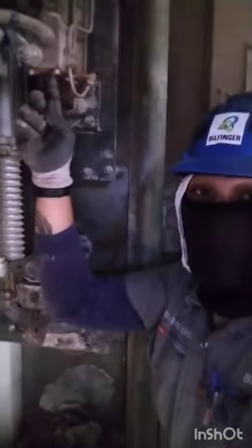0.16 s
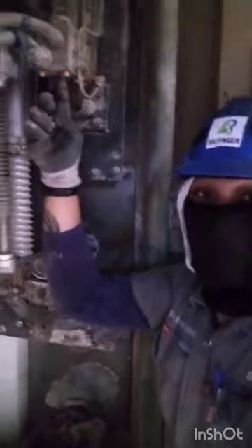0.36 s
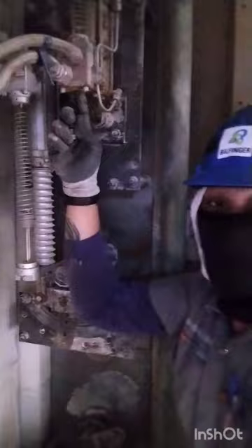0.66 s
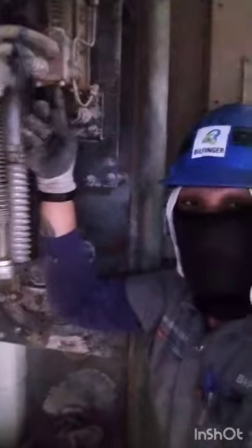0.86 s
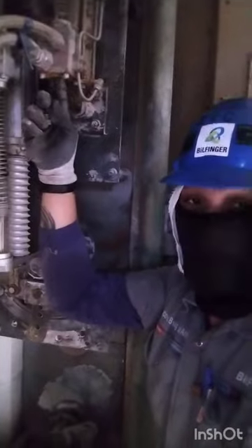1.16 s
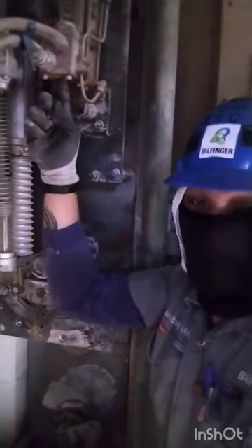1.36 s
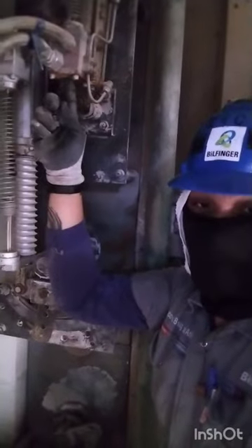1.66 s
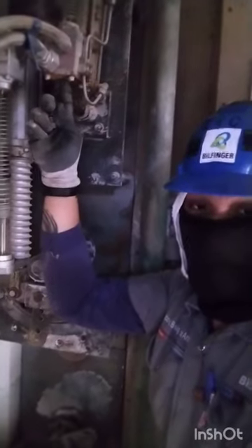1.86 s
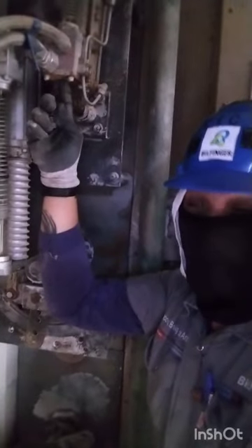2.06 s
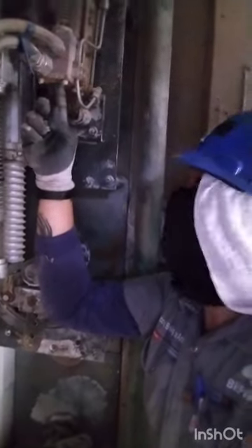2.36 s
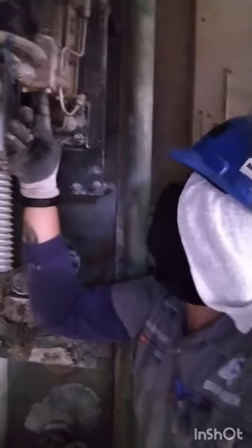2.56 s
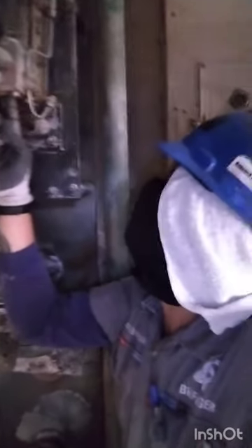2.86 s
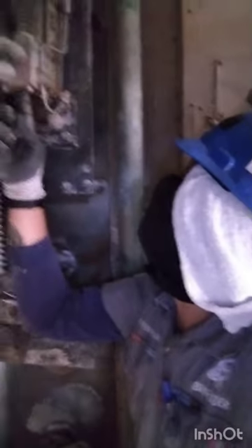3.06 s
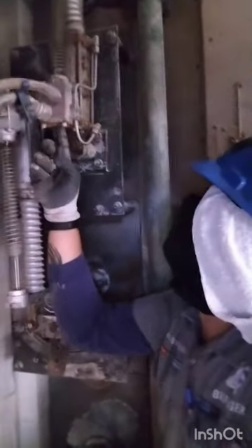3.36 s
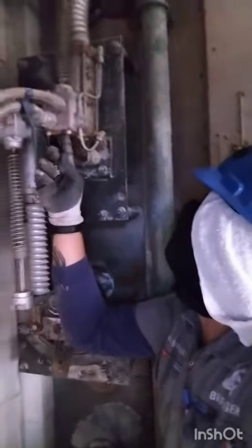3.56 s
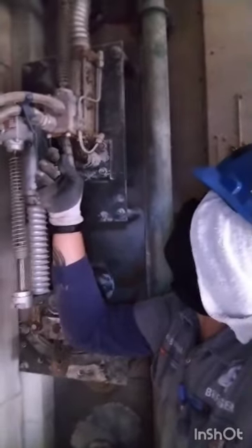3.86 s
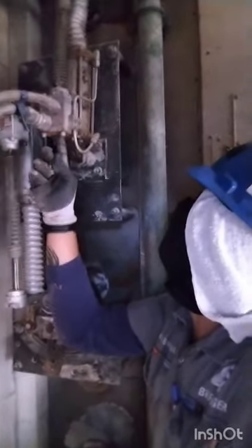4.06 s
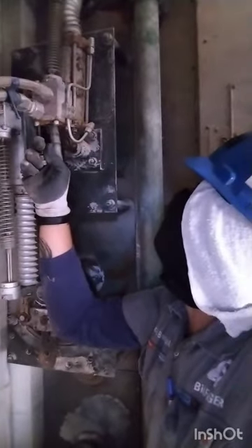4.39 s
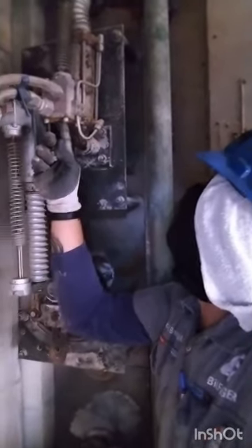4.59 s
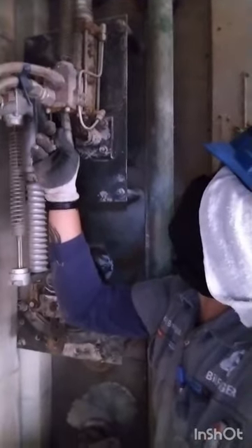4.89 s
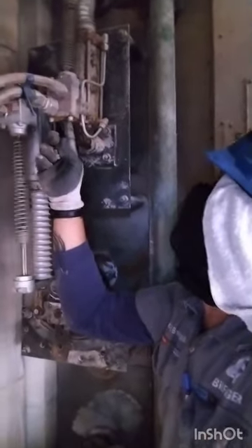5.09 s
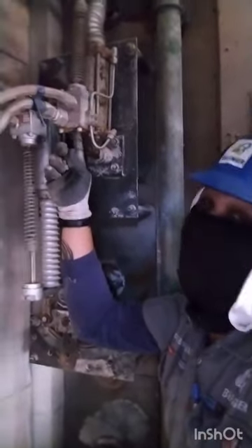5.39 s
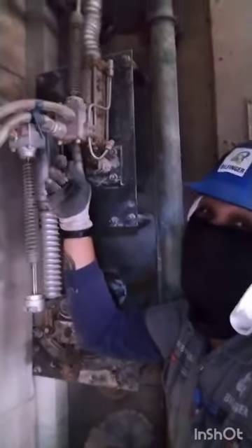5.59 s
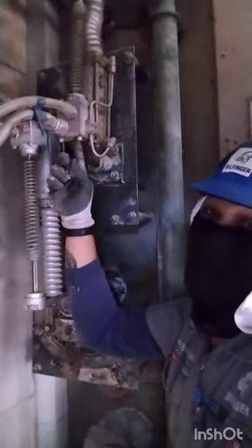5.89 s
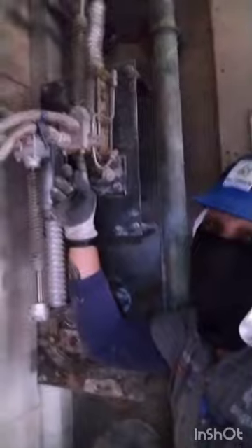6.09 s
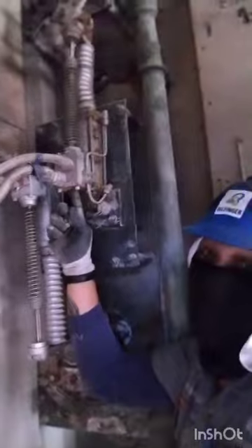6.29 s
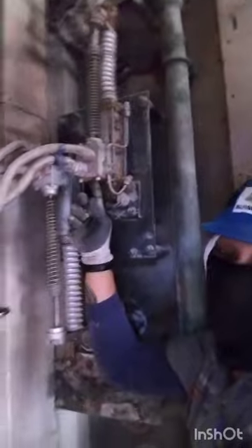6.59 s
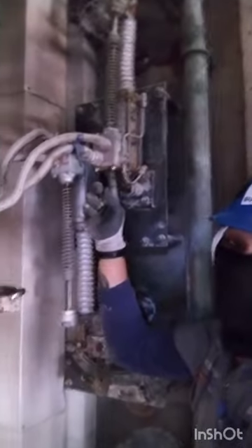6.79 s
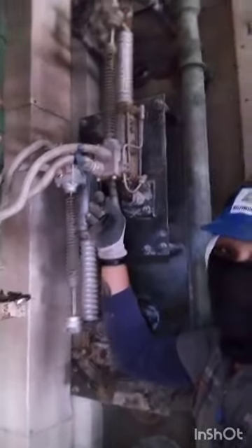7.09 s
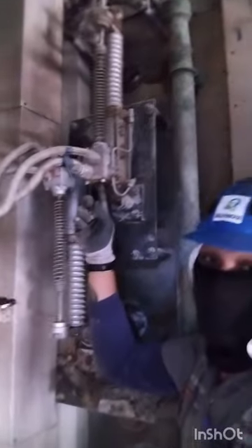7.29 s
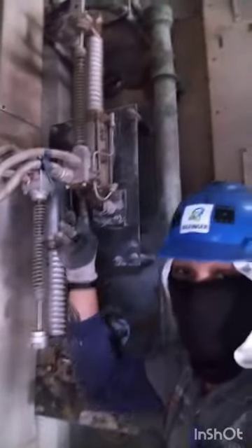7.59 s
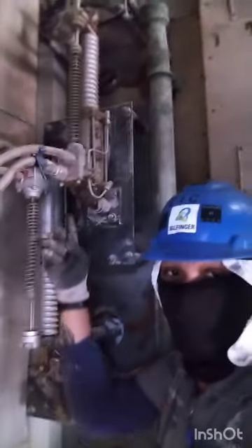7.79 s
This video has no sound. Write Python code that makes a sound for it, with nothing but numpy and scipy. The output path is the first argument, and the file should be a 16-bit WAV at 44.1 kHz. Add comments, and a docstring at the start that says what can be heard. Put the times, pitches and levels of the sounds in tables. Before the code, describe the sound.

Close to a phone microphone, compressed air rushes softly in the lines, stops, then bursts from a valve in a loud, whistling hiss. More soft streaming leads to two briefer blasts. Air then flows again for a longer spell, with two sharp scuffs of a glove on pipe, and dies away near the end. Low machine hum, rumble and the hiss of far leaks fill the industrial hall throughout.

```python
"""A hand-worked pneumatic valve in a plant hall, heard at a phone's two microphone ports.
From the start machines hum, the hall rumbles, far leaks hiss and air streams in the lines until 0.7 s.
At 1.1 s the valve seat spits and an exhaust jet whistles in the outlet. Air streams from 1.9 to 3.7 s
as a glove scuffs the pipe. Two shorter blasts follow at 3.8 and 4.6 s; gain control ducks all three.
Air streams again from 5.1 to 7.5 s, with sharper scuffs near 6 s, then fades into the hall."""
import sys
import numpy as np
from scipy import signal
from scipy.fft import rfft, irfft, next_fast_len
from scipy.io import wavfile
from scipy.ndimage import uniform_filter1d, map_coordinates

SR = 44100
rng = np.random.default_rng(int(sys.argv[2]) if len(sys.argv) > 2 else 0)


def transcribe(signal):
    """Save signal, clipped to [-1, 1], as a 16-bit WAV file at the path in sys.argv[1]."""
    frames = np.atleast_2d(signal).T
    limited = np.clip(frames, -1, 1)
    pcm = np.round(limited * 32767).astype(np.int16)
    wavfile.write(sys.argv[1], SR, pcm)


N = 350154
FRAME, OVERLAP = 512, 384  # samples
BIN_HZ = np.fft.rfftfreq(FRAME, 1 / SR)[:, None]
FRAME_S = signal.stft(np.zeros(N), SR, nperseg=FRAME, noverlap=OVERLAP)[1]
SAMPLE_S = np.arange(N) / SR


def amp(db):
    return 10 ** (np.asarray(db) / 20)


def unit_rms(x):
    return x / np.sqrt(np.mean(np.abs(x) ** 2) + 1e-20)


def at_hz(points, hz):
    f, values = np.transpose(points)
    return np.interp(np.log(hz + 1), np.log(f + 1), values)


def at_time(points, t):
    return np.interp(t, *np.transpose(points))


def colour(spectrum):
    return unit_rms(amp(at_hz(spectrum, BIN_HZ)))


def filtered(x, response):
    size = next_fast_len(N + SR // 2)
    hz = np.fft.rfftfreq(size, 1 / SR)
    return irfft(rfft(x, size) * response(hz), size)[..., :N]


def smooth_random(x, span, step):
    """Spline through random knots, step apart, read at x."""
    knots = rng.standard_normal(int(span / step) + 4)
    return map_coordinates(knots, [x / step])


def random_field(bins, frames):
    """Smooth random values over frequency and time, rms 1."""
    noise = rng.standard_normal((len(BIN_HZ), len(FRAME_S)))
    return unit_rms(uniform_filter1d(uniform_filter1d(noise, bins, 0), frames, 1))


# Port imbalance: f/Hz, left over right/dB
PORT_BALANCE = [(60, 2), (400, 0.5), (750, 3.5), (1050, 5), (1400, 4.5), (1800, 2.5), (2400, 2),
                (3300, 0.5), (4400, 0.5), (7000, 0.5), (8600, -7), (10000, -6.5), (12000, -2), (14000, 3)]
# Likeness of the ports, near and far sources: f/Hz, coherence
NEAR_COHERENCE = [(300, 0.83), (1500, 0.47), (4000, 0.61), (6000, 0.61), (14000, 0.86)]
FAR_COHERENCE = [(60, 0.96), (300, 0.87), (700, 0.32), (1300, 0.057), (14000, 0.022)]
# Valve direction: t/s, left lag/ms
VALVE_LAG = [(0, 0.24), (3, 0.24), (4, 0.18), (5.5, 0.18), (6.5, 0.12), (7.94, 0.099)]


def port_noise(gain, near, patch_db, ripple_db, ripple_frames=300):
    """Stereo noise shaped by gain, with shared drifting patches and a ripple per port."""
    a, b = signal.stft(rng.standard_normal((2, N)), nperseg=FRAME, noverlap=OVERLAP)[2]
    coherence = at_hz(NEAR_COHERENCE if near else FAR_COHERENCE, BIN_HZ)
    angle = np.arccos(coherence) / 2
    mid, side = np.cos(angle) * a, np.sin(angle) * b
    lag_s = at_time(VALVE_LAG, FRAME_S) / 1000 if near else 0
    shift = np.exp(1j * np.pi * BIN_HZ * lag_s) * amp(-at_hz(PORT_BALANCE, BIN_HZ) / 2)
    patches = amp(patch_db * random_field(bins=6, frames=24))
    left = (mid + side) / shift * amp(ripple_db * random_field(bins=2, frames=ripple_frames))
    right = (mid - side) * shift * amp(ripple_db * random_field(bins=2, frames=ripple_frames))
    spectra = gain * patches * np.array([left, right])
    return signal.istft(spectra, nperseg=FRAME, noverlap=OVERLAP)[1][:, :N]


def fine_ripple(hz, step_hz, depth_db):
    """Fine spectral ripple that gives the noise a faint ring; differs per port above the bass."""
    shared = smooth_random(hz, SR / 2, step_hz)
    own = smooth_random(hz, SR / 2, step_hz)
    angle = np.arctan(hz / 500) / 2
    return amp(depth_db * (np.cos(angle) * shared + np.outer([1, -1], np.sin(angle) * own)))


# Phase spread between ports: f/Hz, spread/rad
PHASE_SPREAD = [(500, 0.055), (2000, 0.57), (4500, 0.9), (7000, 1.98)]


def phase_scatter(hz, step_hz=90):
    """Above the bass the two ports' phases part at random."""
    phase = at_hz(PHASE_SPREAD, hz) * smooth_random(hz, SR / 2, step_hz)
    return np.exp(1j * np.outer([.5, -.5], phase))


def peaks_and_notches(x, peaks, pose_edges_s, ripple_db, fade_s):
    """Colours x with peaks, notches and a fine ripple that change from pose to pose."""
    out = 0
    for start, end in zip(pose_edges_s, pose_edges_s[1:]):
        active = [row[:4] for row in peaks if row[4] < (start + end) / 2 < row[5]]

        def response(hz):
            peaks_db = sum(np.outer(port_db, np.exp(-2 * ((hz - centre_hz) / width_hz) ** 2))
                           for centre_hz, width_hz, *port_db in active)
            return amp(peaks_db) * fine_ripple(hz, step_hz=30, depth_db=ripple_db) * phase_scatter(hz)

        inside_s = np.minimum(SAMPLE_S - start if start else 1, end - SAMPLE_S)
        crossfade = np.clip(inside_s / fade_s + .5, 0, 1)
        out = out + filtered(crossfade * x, response)
    return out


# Machine tones: f/Hz, width/Hz, relative level/dB
HUM_TONES = [(91.6, 2.9, -16), (104.7, 6.3, 0), (122, 2, -7), (137.7, 4.4, -1.5), (148.25, 3.5, -1.5)]
# Hum swells: t/s, level/dB
HUM_SWELLS = [(0, -40.5), (.6, -34.5), (1.02, -40.5), (1.8, -39), (2.15, -39), (2.35, -36.5), (3.15, -36),
              (3.41, -43), (3.62, -35), (4.45, -37), (5, -37), (5.37, -39.5), (5.6, -34.5), (6.55, -35.5),
              (6.8, -40.5), (7.2, -38.5), (7.32, -34), (7.94, -40.5)]


def machine_hum(hall_noise, evenness=0.23):
    """Wavering machine tones: narrow noise bands, their swells partly evened out."""
    total = 0
    for centre_hz, width_hz, db in HUM_TONES:
        tone = unit_rms(filtered(hall_noise, lambda hz: 1 / (1 + (2 * (hz - centre_hz) / width_hz) ** 2)))
        envelope = np.abs(signal.hilbert(tone.mean(axis=0), next_fast_len(N))[:N])
        total = total + amp(db) * unit_rms(tone / (envelope + 0.37) ** evenness)
    return amp(at_time(HUM_SWELLS, SAMPLE_S)) * unit_rms(total)


# Hall rumble: f/Hz, density/dB
RUMBLE_SPECTRUM = [(15, -55), (25, -29), (50, -12), (64, -5.5), (170, -3), (240, -2.5), (310, -4),
                   (590, -7.5), (680, -24), (900, -26), (1050, -38), (1300, -55), (1700, -60), (2900, -120)]


def hall_rumble(hall_noise, level_db=-38.5, wander_db=1, wander_per_s=2.39):
    """Low noise with a faint ring; the level wanders."""
    def response(hz):
        return amp(at_hz(RUMBLE_SPECTRUM, hz)) * fine_ripple(hz, step_hz=12, depth_db=2.5)

    rumble = unit_rms(filtered(hall_noise, response))
    wander = smooth_random(SAMPLE_S, N / SR, 1 / wander_per_s)
    return amp(level_db + wander_db * wander) * rumble


# Steady leaks, flow-driven leak: f/Hz, density/dB
LEAK_SPECTRUM = [(2500, -61), (3800, -35), (4400, -14), (5200, -6), (6000, 0.5), (7000, 0), (8600, -4),
                 (9300, -11.5), (11000, -25), (12700, -44), (14400, -36)]
FIZZ_SPECTRUM = [(3000, -60), (4400, -10), (5200, -5), (6000, 1), (7000, 0), (8600, -4), (9300, -7),
                 (11000, -13.5), (12700, -17.5), (14400, -22)]


def far_leaks(steady_db=-37, fizz_re_flow_db=-8.5):
    """Far leaks hiss steadily; one more follows the line flow."""
    steady = amp(steady_db) * colour(LEAK_SPECTRUM)
    fizz = amp(fizz_re_flow_db) * line_flow(FRAME_S) * colour(FIZZ_SPECTRUM)
    hiss = port_noise(np.hypot(steady, fizz), near=False, patch_db=0.7, ripple_db=2.5)
    return filtered(hiss, lambda hz: fine_ripple(hz, step_hz=24, depth_db=2.5))


# Spells of flow: start/s, rise/s, stop/s, level/dB, fade/(dB/s)
FLOW_SPELLS = [(-.3, .1, 0.7, -28, 55), (1.9, 0.053, 3.68, -30, 15), (5.06, 0.26, 7.52, -24.5, 104)]


def line_flow(t, sag_db_per_s=0.3, trickle_db=-53):
    """Gain of the streaming air: rises, sags, fades at cut-off to a trickle."""
    total = amp(trickle_db)
    for start, rise, stop, db, fade_db_per_s in FLOW_SPELLS:
        loss_db = sag_db_per_s * (t - start) + fade_db_per_s * np.maximum(t - stop, 0)
        total = total + np.clip((t - start) / rise, 0, 1) * amp(db - loss_db)
    return total


# Line hiss, throaty band: f/Hz, density/dB
LINE_SPECTRUM = [(700, -106), (1200, -7.5), (1500, -6), (2000, 1.5), (2500, 3), (3200, -1.5), (4000, -4.5),
                 (4500, -9), (5200, -13.5), (6800, -51), (11400, -120)]
THROAT_SPECTRUM = [(320, -12.5), (550, -0.5), (700, -5), (900, -0.5), (1200, -0.5), (1500, -4.5),
                   (1950, -31), (3300, -120)]
# Throaty band: t/s, level over hiss/dB
THROAT_LEVEL = [(0, -14), (.8, -15), (1.9, -19), (2.5, -18.5), (2.88, -21), (2.96, -32), (3.15, -49),
                (3.72, -40), (3.78, -6), (4.45, -14), (5.2, -32), (5.45, -21), (5.8, -15), (6.15, -15),
                (6.4, -12.5), (7.4, -19), (7.94, 1.5)]
# Peaks and notches that colour the stream: f/Hz, width/Hz, left/dB, right/dB, from/s, until/s
STREAM_PEAKS = [(1194, 180, -6.5, -10, 0.5, 6.8), (973, 140, -8.5, -3, 5.5, 7.2),
                (1464, 52, -9, -5, 6.5, 9.4), (1583, 62, 4, -4, 1, 5.7), (1755, 87, 3, -2.5, 0.5, 8),
                (2073, 69, 5.5, 6, 5, 7), (2370, 200, 5, 4.5, -1, .7), (1790, 90, -6, -6, -1, 1.4),
                (4030, 100, 3, 3, -1, 3.7), (3320, 120, 3, 3, -1, .7), (2900, 200, 3, 4, .7, 1.4),
                (2164, 150, 3, -0.5, 0, 5.7), (3580, 160, 5.5, 5, 1.5, 2.8), (1470, 65, -7, -10, 1, 2.8),
                (2383, 130, 5.5, 7.5, 1, 4.2), (2400, 90, 3, 4, 6.8, 7.6), (2550, 90, 6, 6, 6.8, 8),
                (3010, 82, 4, 3.5, 7, 8), (2230, 100, 2, 3, 7.5, 8), (3790, 190, 1.5, 1.5, 5.5, 7.6),
                (1190, 140, 8, 14, 5, 6), (840, 200, 4, 4, 0.5, .6), (1160, 260, -3.5, -6, 0, .5),
                (3750, 300, -5, -3, 7, 8), (1980, 180, -3, -1, 7, 8), (1700, 120, 2, 3, 5.5, 8),
                (2540, 120, -1.5, -3.5, 5.5, 8), (2655, 62, 7, -1, 5, 6.8), (2970, 150, -3, -2.5, -2, 4.1),
                (2890, 67, -0.5, -5, 5.5, 8), (3300, 100, 5, 5, 1.9, 3.7), (3190, 200, 8, 8, 5.1, 6.8),
                (3950, 160, -3, -3, 6.1, 6.8), (3480, 120, 3, 3, 5.1, 7.6), (2816, 79, 4.5, 2, 5, 6.8),
                (4280, 120, -5, -4, 1.5, 3.5), (4570, 300, 3.5, 2.5, 6, 9.4)]
# Phone pose edges: t/s
STREAM_POSES = [0, .7, 1.4, 2.1, 2.75, 3.4, 4.1, 4.8, 5.25, 6.05, 6.75, 7.6, 8.2]


def air_stream(faint_db=-34.5, thin_hz=1230, thin_octaves=0.25, thin_db_per_db=1.7, lean_db_per_db=0.91):
    """Air rushing through the lines; below faint_db it loses its low edge and leans left."""
    def shortfall(t):
        return np.maximum(amp(faint_db) / line_flow(t), 1)

    low_edge = np.exp(-(np.log2((BIN_HZ + 1) / thin_hz) / thin_octaves) ** 2 / 2)
    thinning = shortfall(FRAME_S) ** (-thin_db_per_db * low_edge)
    throat = amp(at_time(THROAT_LEVEL, FRAME_S)) * colour(THROAT_SPECTRUM)
    gain = line_flow(FRAME_S) * thinning * np.hypot(colour(LINE_SPECTRUM), throat)
    air = port_noise(gain, near=True, patch_db=1.2, ripple_db=.5)
    lean = shortfall(SAMPLE_S) ** (lean_db_per_db * np.array([[.5], [-.5]]))
    return peaks_and_notches(air * lean, STREAM_PEAKS, STREAM_POSES, ripple_db=3.0, fade_s=0.14)


# Glove on pipe, air spits at the seat: t/s, level/dB, low f/Hz, high f/Hz, rise/s, t60/s
GLOVE_SCUFFS = [(0.0101, -34, 500, 680, 0.017, 0.41), (2.165, -30.5, 540, 900, 0.0074, 0.22),
                (3.82, -23.5, 160, 690, 0.047, 1), (4.22, -40, 230, 262, 0.035, 0.28),
                (2.49, -38, 500, 820, .01, 0.17), (2.83, -38, 500, 800, .012, 0.26),
                (4.2, -28.5, 510, 760, 0.043, 0.59), (5.83, -30, 460, 895, 0.017, .5),
                (7.52, -35, 510, 830, .015, 0.2), (5.11, -33, 980, 1402, .008, 0.14),
                (5.46, -32.5, 440, 1200, 0.011, 0.32), (5.83, -22.5, 480, 3600, 0.011, 0.39),
                (6.205, -23, 530, 3600, 0.01, 0.6), (5.83, -23.5, 5700, 8600, 0.012, 0.33),
                (6.215, -25.5, 5200, 8500, 0.011, 0.48)]
SEAT_SPITS = [(1.114, -24, 1100, 3000, .003, .25), (1.128, -25, 10500, 14000, .006, .15)]


def scuffs_and_spits():
    """Glove bumps and scuffs, and the spit as the seat breaks open: short bursts of band noise."""
    out = np.zeros((2, N + SR))
    t = np.arange(SR // 2) / SR
    for start_s, db, low_hz, high_hz, rise_s, t60_s in GLOVE_SCUFFS + SEAT_SPITS:
        band = signal.butter(3, [low_hz, high_hz], "band", fs=SR, output="sos")
        shared, *own = rng.standard_normal((3, len(t)))
        noise = unit_rms(signal.sosfilt(band, shared + 0.79 * np.array(own)))
        envelope = amp(db - 60 * t / t60_s) * (1 - np.exp(-t / rise_s))
        first = round(start_s * SR)
        out[:, first:first + len(t)] += envelope * noise
    return out[:, :N]


# Blasts: open/s, rise/s, shut/s, fall/s, jet/dB, whistle/dB, roar/dB,
# whistle first f/Hz, last f/Hz, width/Hz, mid-blast swell/dB
EXHAUST_BLASTS = [(1.111, 0.013, 1.645, 0.048, -10, -21, -18.5, 8200, 8050, 450, 4),
                  (3.84, 0.045, 4.1, 0.16, -11.5, -18, -17, 8600, 8400, 380, 2),
                  (4.565, 0.15, 4.87, 0.055, -12.5, -22, -18, 8100, 8040, 300, 0)]
# Bright jet, lower roar: f/Hz, density/dB
JET_SPECTRUM = [(2120, -40), (3600, -13.5), (3810, -18.5), (4410, -12.5), (5220, -16.5), (7180, -6),
                (7880, -4), (10500, -23.5), (14400, -13.5)]
ROAR_SPECTRUM = [(150, -42), (300, -21.5), (600, -9), (1100, -7.5), (1800, -2), (2500, 3.5), (3500, -6),
                 (4200, -10.5), (5500, -11), (8800, -120)]
# Peaks and notches that colour each blast: f/Hz, width/Hz, left/dB, right/dB, from/s, until/s
BLAST_PEAKS = [(860, 115, 2, 4, 0, 8), (1030, 114, -6.5, -6, -0.5, 8), (1470, 90, -3, -4, 0.5, 3),
               (1900, 180, 3, 3, 4, 8), (2810, 99, 4.5, 1, 0, 3), (5190, 70, -12, -12, 1, 3),
               (4760, 130, -8, -10, -0.5, 3), (4200, 100, -5, -5, 0, 3), (4980, 83, 3.5, 2, 0, 3),
               (1640, 230, 2, 2, 0, 3), (3000, 90, -5, -7, 0, 3), (2860, 130, -5, -5, 3, 8),
               (3560, 200, 6, 0.5, -1, 3), (3400, 350, 8, 2, 3.5, 8), (3810, 170, -12, -8, -0.5, 3),
               (3700, 90, -10, -10, 3, 8), (4080, 80, -7, -7, 3, 8), (4240, 100, 5, 3, 2.5, 8),
               (4040, 110, 5.5, 4, 0, 3), (4410, 130, 5, 0.5, 0, 8), (4670, 80, -9, -6, 3, 8),
               (4850, 70, -7, -5, 3.5, 8), (5120, 160, -15, -15, 2.9, 5.3), (5210, 130, -16, -16, 5.3, 8),
               (3900, 80, -8, -8, 5.3, 8), (5780, 70, -8, -8, 2.5, 8), (5530, 120, 7, 3, 3, 8),
               (5870, 130, 8.5, 8, 3, 8), (4750, 80, 4.5, 5, 2.5, 8), (6200, 200, 6, 1, 3, 8),
               (6230, 140, -2, -2, 0, 4), (6460, 150, 6, 5.5, -1, 3), (7300, 170, -9, -6, -1, 3),
               (7200, 200, -6, -7, 5.3, 8), (7660, 130, -8, 3, -1, 2.9), (7990, 98, 8, 9, -1, 2.9),
               (7930, 110, 12, 12, 5.3, 8), (7600, 150, 5, 3, 5.3, 8), (8420, 130, 5, 5, 5.3, 8),
               (8400, 200, -7, -7, -1, 2.9), (8720, 130, 5, 5, -1, 2.9), (8310, 110, 5, 7, 2.9, 5.3),
               (8590, 110, 5, 7, 2.9, 3.9), (7300, 150, 4, 3, 2.9, 5.3), (9280, 180, 6.5, -11, -1, 8),
               (9540, 120, -6, -6, -1, 8), (12200, 3300, -4, -3.5, 5.3, 8), (624, 270, 2.5, 4, 0.5, 3),
               (8140, 110, -5, -3, 5.3, 8), (6530, 300, 2, 1.5, 0, 3)]
# Phone pose edges: t/s
BLAST_POSES = [0, 1.3, 1.5, 2.9, 4.05, 4.5, 8]


def exhaust(half_open_db=5.5, bleed_db_per_s=92, bleed_hz=8040):
    """Turbulent jet; the outlet cavity sings a broad whistle, keenest with the valve half open."""
    t, gain = FRAME_S, 0
    for (opens, rise, shuts, fall, jet_db, whistle_db, roar_db,
         first_hz, last_hz, width_hz, swell_db) in EXHAUST_BLASTS:
        closed = shuts + fall
        gap = np.clip(np.minimum((t - opens) / rise, 1 - (t - shuts) / fall), 0, 1)
        progress = np.clip((t - opens) / (closed - opens), 0, 1)
        swell = amp(swell_db * np.sin(np.pi * progress) ** 2)
        # trapped pressure bleeds off as the valve shuts
        bleed = (t > shuts) * (1 - gap) * amp(-bleed_db_per_s * np.maximum(t - closed, 0))
        whistle_hz = np.interp(t, [opens + rise, shuts, closed], [first_hz, last_hz, bleed_hz])
        cavity = unit_rms(1 / (1 + ((BIN_HZ - whistle_hz) / width_hz) ** 2))
        drive = gap ** 1.04 * amp(half_open_db * np.sin(np.pi * gap))
        whistle = amp(whistle_db) * (drive + amp(-11.5) * bleed) * cavity
        jet = amp(jet_db) * (gap ** 1.27 + amp(-20) * bleed) * colour(JET_SPECTRUM)
        roar = amp(roar_db) * (gap + amp(-9) * bleed) * colour(ROAR_SPECTRUM)
        gain = gain + swell * np.sqrt(whistle ** 2 + jet ** 2 + roar ** 2)
    eddies_db = 0.64 * random_field(bins=120, frames=4) + 1.02 * random_field(bins=120, frames=24)
    air = port_noise(gain * amp(eddies_db), near=True, patch_db=0.66, ripple_db=2.5, ripple_frames=40)
    return peaks_and_notches(air, BLAST_PEAKS, BLAST_POSES, ripple_db=2.5, fade_s=.1)


def scene():
    """Valve and line air over the sounds of the hall."""
    air = exhaust() + air_stream() + far_leaks()
    hall_noise = port_noise(gain=1, near=False, patch_db=0.9, ripple_db=0.5)
    return air + machine_hum(hall_noise) + hall_rumble(hall_noise) + scuffs_and_spits()


# Phone's treble edge: f/Hz, gain/dB
TREBLE_EDGE = [(14200, 0), (14300, -36), (15500, -65)]


def record(dry, knee_db=-21, duck_db_per_db=0.46, smoothing_s=0.012, ceiling=0.71, cutoff_hz=15531):
    """Gain control ducks loud passages, peaks round off, the treble ends steeply."""
    pole = np.exp(-1 / (smoothing_s * SR))
    power = signal.lfilter([1 - pole], [1, -pole], np.mean(dry ** 2, axis=0))
    ducked = dry * (1 + power / amp(knee_db) ** 2) ** (-duck_db_per_db / 2)
    rounded = ducked / (1 + np.abs(ducked / ceiling) ** 4) ** (1 / 4)
    return filtered(rounded, lambda hz: amp(at_hz(TREBLE_EDGE, hz)) * (hz < cutoff_hz))


dry = scene()
out = record(dry)
transcribe(out)
```